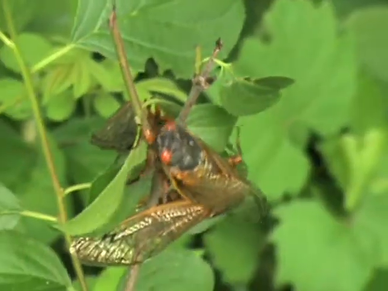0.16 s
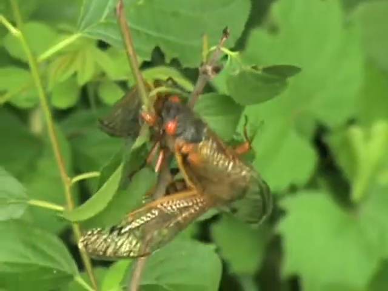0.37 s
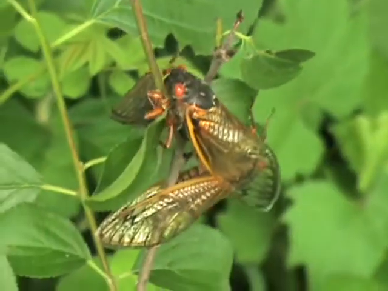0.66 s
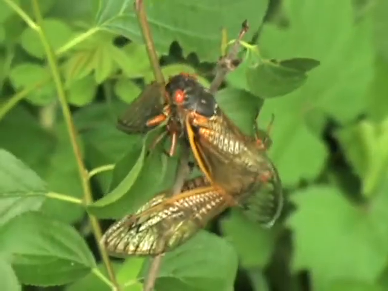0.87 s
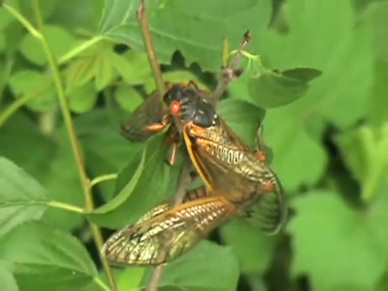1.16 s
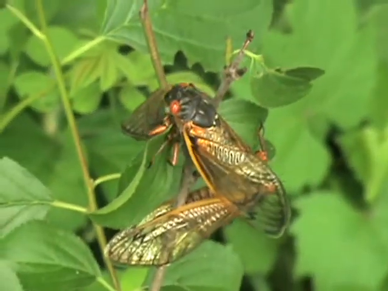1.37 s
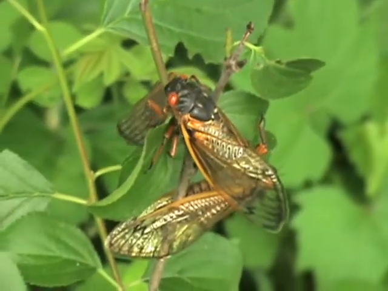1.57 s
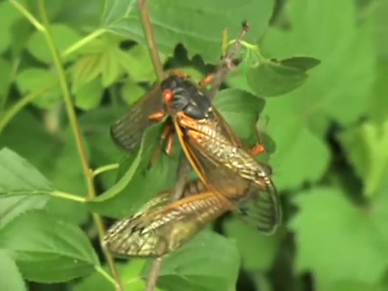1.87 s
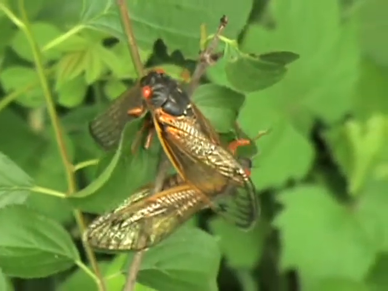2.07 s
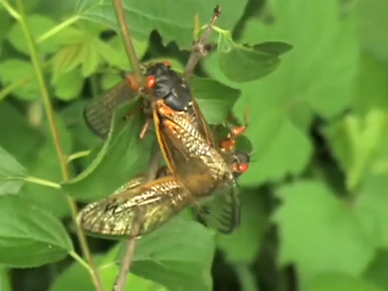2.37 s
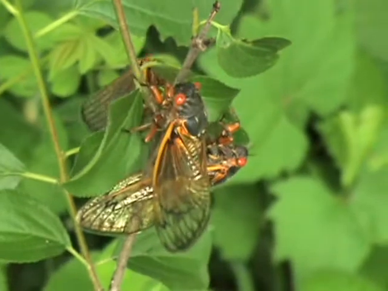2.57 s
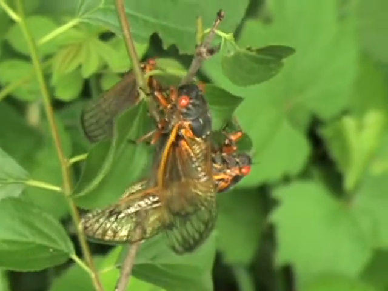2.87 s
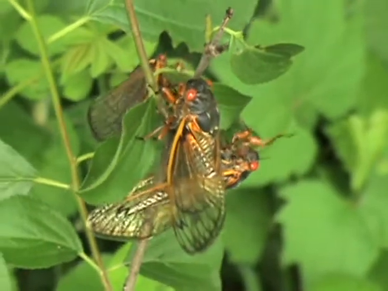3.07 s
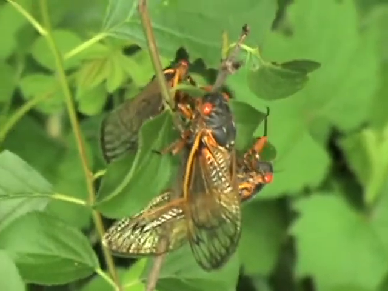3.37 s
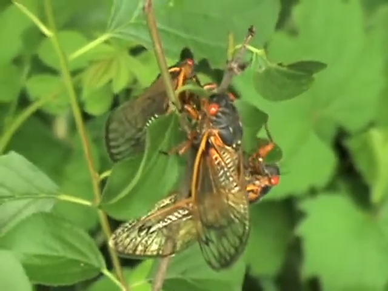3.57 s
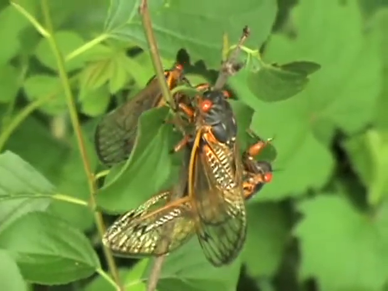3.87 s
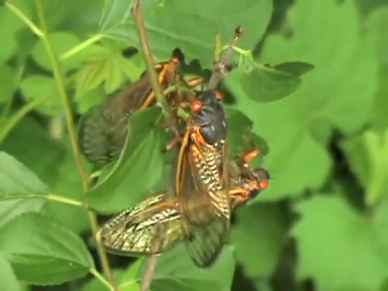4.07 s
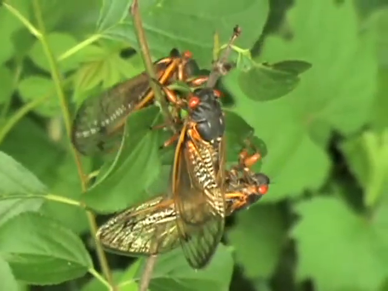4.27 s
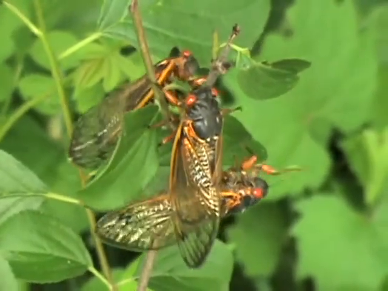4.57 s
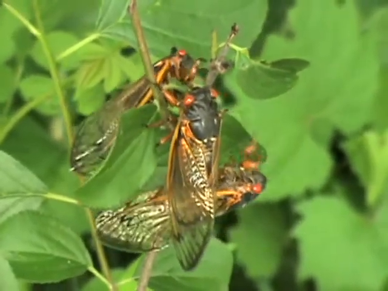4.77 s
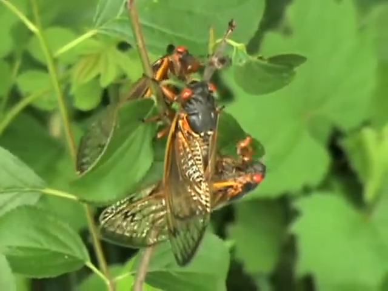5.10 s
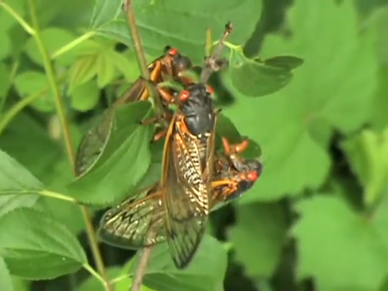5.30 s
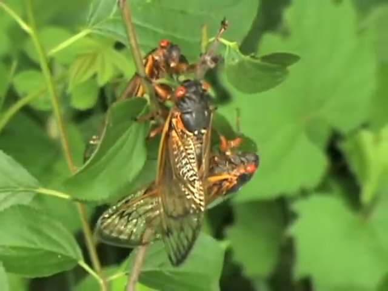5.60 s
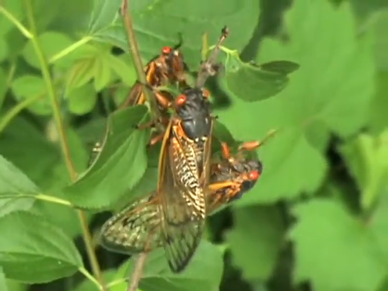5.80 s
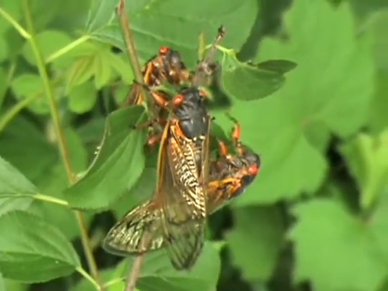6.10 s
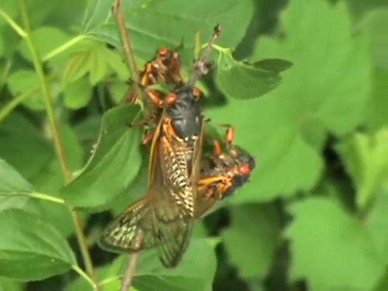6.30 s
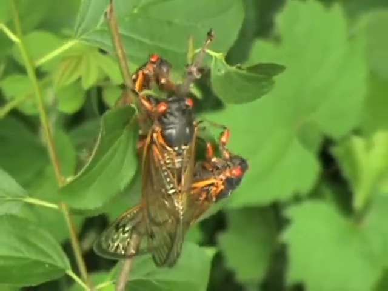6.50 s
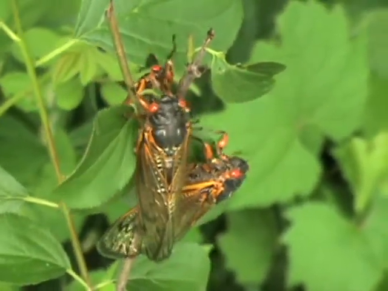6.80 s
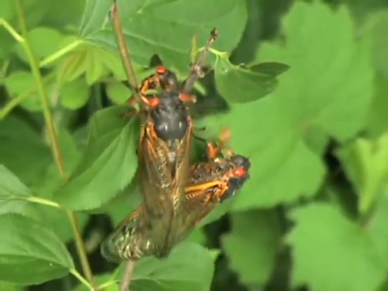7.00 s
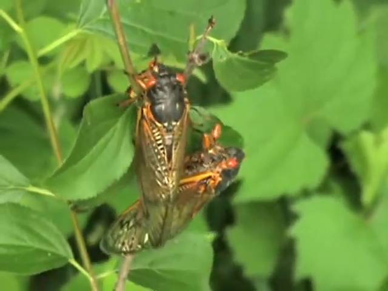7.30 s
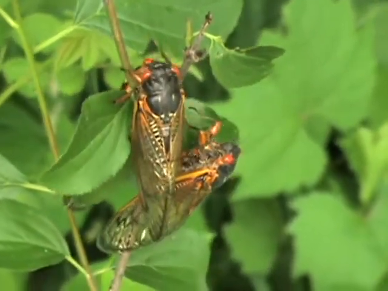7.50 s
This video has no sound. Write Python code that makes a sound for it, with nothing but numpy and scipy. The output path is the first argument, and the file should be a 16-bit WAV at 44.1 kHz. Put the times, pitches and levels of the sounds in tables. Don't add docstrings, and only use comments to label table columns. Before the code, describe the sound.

From 0 seconds a far crowd of cicadas drones all around in the trees, a steady, hollow, slightly rough hum centred around 1.3 kilohertz, without pauses and nearly constant in level. Under it is a soft low rumble of wind on the microphone and faint distant engines, their low hums slowly rising or sinking. Leaves hiss broadly, strongest at the start, easing around 3.5 to 4.7 seconds, then returning. A barely audible thin motor whine stays throughout. Near 2.7 seconds a nearby wing makes three tiny dry rubs on a leaf, slightly left. A small low gust bumps around 4.65. At about 5.65 comes a sharper snap, followed at once by a gritty flutter until 5.8. Four weaker rubs follow at 6.3 to 6.5. A short, faint rising bird whistle sounds far off at 6.8. The drone continues to the end at about 7.65, with a last low engine hum rising.

```python
import sys
import numpy as np
from scipy import signal
from scipy.fft import rfft, irfft
from scipy.io import wavfile
from scipy.ndimage import uniform_filter1d

SR = 44100
rng = np.random.default_rng(int(sys.argv[2]) if len(sys.argv) > 2 else 0)


def output_pcm(signal):
    pcm = np.clip(np.atleast_2d(signal).T, -1, 1) * 32767
    wavfile.write(sys.argv[1], SR, np.round(pcm).astype(np.int16))


def natural_amplitude(level_db):
    exponent = np.asarray(level_db, float) / 20
    return 10 ** exponent


N = 337365


def evened(x):
    return x / np.sqrt(np.mean(abs(x) ** 2) + 1e-20)


def read(points, hz):
    f, value = np.transpose(points)
    return np.interp(np.log(hz + 1), np.log(f + 1), value)


def follow(rows, t):
    s, *columns = np.transpose(rows)
    return [np.interp(t, s, c) for c in columns]


# f/Hz, likeness (1 = same)
LIKENESS = [(60, 1), (130, 1), (290, 0.86), (640, 0.67), (1410, 0.54), (3100, 0.72), (6820, 0.87),
            (15000, 0.79)]
# f/Hz, level/dB
LEFT_LEAN = [(60, -1), (110, 0), (200, -0.5), (380, 1.5), (700, 0.5), (1290, 0.5), (2380, -0.5),
             (4400, -0.5), (8120, 0.0), (15000, 0.5)]


def gusts(colour, level_db, tilt_db, pivot_hz, patchy_db, size):
    hop = size // 4
    frames, hz = N // hop + 5, np.fft.rfftfreq(size, 1 / SR)
    a, b, c, d, patches = rng.standard_normal((frames, len(hz), 5)).T
    patches = uniform_filter1d(patches, size=12, axis=0)
    patches = evened(uniform_filter1d(patches, size=10, axis=1))

    same = np.clip(read(LIKENESS, hz), -1, .988)[:, None]
    left, other = a + 1j * b, c + 1j * d
    spectra = np.array([left, same * left + np.sqrt(1 - same ** 2) * other])

    octaves = np.log2(np.clip(hz[:, None], 30, 9000) / pivot_hz)
    tilt = tilt_db[np.minimum(np.arange(frames) * hop, N - 1)] * octaves
    lean = read(LEFT_LEAN, hz)[:, None] * np.array([.5, -.5])[:, None, None]
    spectra = spectra * natural_amplitude(read(colour, hz)[:, None] + patchy_db * patches + tilt + lean)
    noise = signal.istft(spectra, nperseg=size, noverlap=size - hop)[1][:, :N]
    return natural_amplitude(level_db) * evened(noise)


# t/s, level/dB
WIND = [(0, -0.5), (1.2, -1), (3.6, -3.5), (4.7, -3), (5.7, -1), (6.8, -1), (7.65, -2)]


def wind(t):
    return follow(WIND, t)[0]


# f/Hz, level/dB per Hz
RUMBLE_COLOUR = [(7, -22), (20, -6), (30, -2.5), (45, -1), (70, 0), (100, -1), (130, -3.5), (170, -6.5),
                 (230, -11), (400, -32), (800, -120)]


def rumble(t):
    gust = np.exp(-((t - 4.65) / .2) ** 2)
    level_db = -36 + 0.21 * wind(t) + 1 * gust
    brighten_db = 1.5 * gust
    return gusts(RUMBLE_COLOUR, level_db, brighten_db, pivot_hz=90, patchy_db=.3, size=4096)


def tones(rows, waver_hz):
    out = np.zeros(N)
    for start, end, start_hz, end_hz, db in rows:
        t = np.arange(round((end - start) * SR)) / SR
        waver = np.interp(t, np.linspace(0, t[-1], num=12), rng.standard_normal(size=12))
        hz = np.linspace(start_hz, end_hz, len(t)) + waver_hz * waver
        fade = signal.windows.tukey(len(t), .4)
        tone = np.sqrt(2) * natural_amplitude(db) * fade * np.sin(2 * np.pi * np.cumsum(hz) / SR)
        part = out[round(max(start, 0) * SR):][:len(t)]
        part += tone[:len(part)]
    return out


# start t/s, end t/s, start f/Hz, end f/Hz, level/dB
ENGINES = [
    (0, 3.3, 163, 176, -52),
    (0, 4.4, 90, 84, -47),
    (0, .8, 108, 107, -47),
    (1.4, 2.8, 108, 106, -47),
    (4.1, 4.95, 138, 146, -47),
    (2.0, 3.4, 40, 37, -49),
    (4.2, 5.6, 38, 38, -47),
    (5.6, 7.65, 60, 66, -50),
    (6.9, 7.65, 78, 84, -46),
]


def engines():
    return tones(ENGINES, waver_hz=1.34)


# f/Hz, level/dB per Hz
LEAF_COLOUR = [(150, -7.5), (280, 6.5), (500, 5), (900, 7), (1700, 3), (2500, 0.5), (4000, -2), (5200, -3),
               (5600, -5), (7500, -6), (9000, -10.5), (11000, -18.5), (13000, -25.5), (16000, -31)]


def leaves(t):
    wind_db = wind(t)
    brighten_db = 0.17 * wind_db
    return gusts(LEAF_COLOUR, -35.5 + wind_db, brighten_db, pivot_hz=4000, patchy_db=0.29, size=1024)


def motor(t):
    whine_hz, whine_db = 2520, -67
    return natural_amplitude(whine_db) * np.sin(2 * np.pi * whine_hz * t)


# start t/s, end t/s, start f/Hz, end f/Hz, level/dB
BIRD = [
    (6.79, 6.93, 3150, 3270, -53),
]


def bird():
    return tones(BIRD, waver_hz=70)


# t/s, level/dB, length/s
RUBS = [(2.708, -40, .008), (2.764, -42, .006), (2.790, -41, .006), (5.681, -31, .017), (5.704, -32, .007),
        (5.733, -36, .024), (5.757, -36, .014), (5.775, -37, .013), (6.331, -40, .008), (6.381, -39, .010),
        (6.418, -38, .009), (6.454, -40, .007)]


def flicks():
    right_db, lag_ms = -4, .11
    out, t = np.zeros(N), np.arange(2048) / SR
    hz = np.fft.rfftfreq(len(t), 1 / SR)
    # t/s, level/dB, length/s, f/Hz, width/Hz; the first strike is sharper and higher
    snap = (5.646, -28.5, .004, 3000, 1900)
    strokes = [snap] + [(*row, 1900, 570) for row in RUBS]
    for s, db, length, pitch_hz, width_hz in strokes:
        grit = rng.standard_normal(len(t)) * natural_amplitude(4.8 * rng.standard_normal(len(t)))
        grit = evened(irfft(rfft(grit) / (1 + ((hz - pitch_hz) / width_hz) ** 4)))
        grit = grit / np.sqrt(uniform_filter1d(grit ** 2, size=130))
        stroke = np.clip(t / 0.0012, 0, 1) * np.exp(-(t / length) ** 3)
        out[round(s * SR):][:len(t)] += natural_amplitude(db) * grit * stroke
    lag = np.exp(-2j * np.pi * np.fft.rfftfreq(N, 1 / SR) * lag_ms / 1000)
    return np.array([out, natural_amplitude(right_db) * irfft(rfft(out) * lag, N)])


# t/s, level/dB
CHORUS = [(0, -31), (1, -31.5), (2.3, -32.5), (4.6, -31.5), (5.6, -31), (6.2, -32), (7.65, -32)]
# f/Hz, level/dB
AIR_SAC = [(700, 2), (1000, 8.5), (1100, 6), (1200, 0), (1250, 1.5), (1310, -2.5), (1350, 1), (1395, -1),
           (1450, -3), (1520, 1), (1600, 4.5), (2000, 3.5)]


def chorus(count=110):
    song_hz, spread_hz, sac_width_hz, clicks_per_s = 1342.3, 60, 91.5, 240
    call_s, rest_s, slur = 2.2, 1.2, .2
    lean_db = -1.3
    rate, centre = SR / 15, 1350
    t = np.arange(N // 15) / rate
    level_db, = follow(CHORUS, t)
    start, pace, spin = rng.random((count, 3, 1)).transpose(1, 0, 2)
    size, far, bearing = rng.standard_normal((count, 3, 1)).transpose(1, 0, 2)

    period_s = (call_s + rest_s) * (.8 + .4 * pace)
    place = (start + t / period_s) % 1 * (1 + rest_s / call_s)
    ending = np.clip((place - .72) / .28, 0, 1)
    effort = np.clip(place / 0.2, 0, 1) * (1 - ending ** 2.26) * natural_amplitude(2.0 * far)
    hz = (song_hz + spread_hz * size) * (1 - slur * ending ** 1.5)

    clicks = rng.random(hz.shape) < clicks_per_s / rate
    clicks = clicks * np.exp(2j * np.pi * rng.random(hz.shape))
    r = np.exp(-np.pi * sac_width_hz / rate)
    ring = signal.lfilter([1], np.convolve([1, -r], [1, -r]), clicks * effort)
    songs = ring * np.exp(2j * np.pi * (np.cumsum(hz - centre, axis=1) / rate + spin))

    pair = np.array([songs.sum(0), (songs * np.exp(.8j * bearing)).sum(0)])
    pair = pair / np.sqrt(uniform_filter1d(abs(pair) ** 2, size=1500, axis=1))
    pitch_hz = abs(centre + np.fft.fftfreq(len(t), 1 / rate))
    pair = np.fft.ifft(np.fft.fft(pair) * natural_amplitude(read(AIR_SAC, pitch_hz)))
    pair = evened(pair) * natural_amplitude(level_db + lean_db * np.array([[.5], [-.5]]))
    carrier = np.exp(2j * np.pi * centre * np.arange(N) / SR)
    return np.sqrt(2) * (signal.resample(pair, N, axis=1) * carrier).real


def scene():
    t = np.arange(N) / SR
    background = rumble(t) + engines() + leaves(t) + motor(t)
    return background + bird() + flicks() + chorus()


def band_limit(x):
    return signal.sosfilt(signal.butter(12, 15660, fs=SR, output="sos"), x)


def record(dry):
    low_cut = signal.butter(2, 18, "high", fs=SR, output="sos")
    mix = signal.sosfilt(low_cut, dry)
    return band_limit(mix)


dry = scene()
out = record(dry)
output_pcm(out)
```